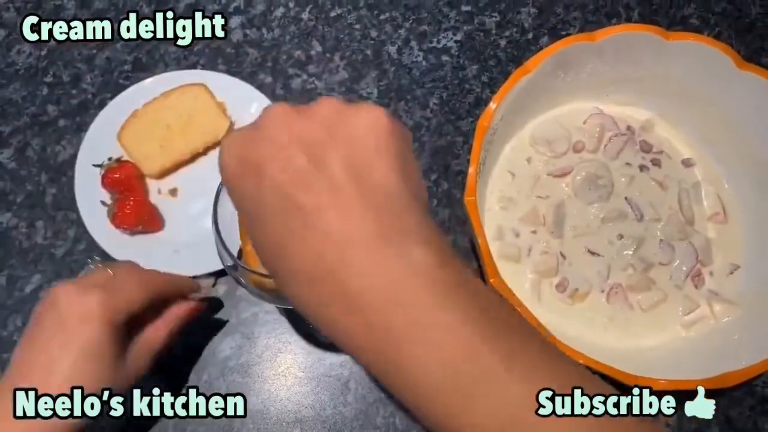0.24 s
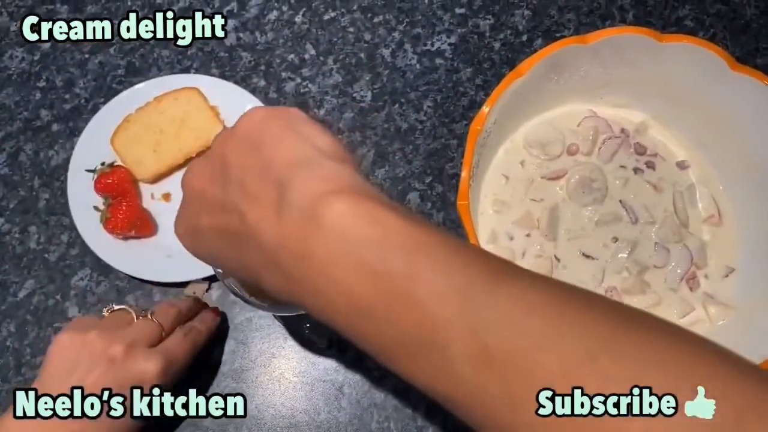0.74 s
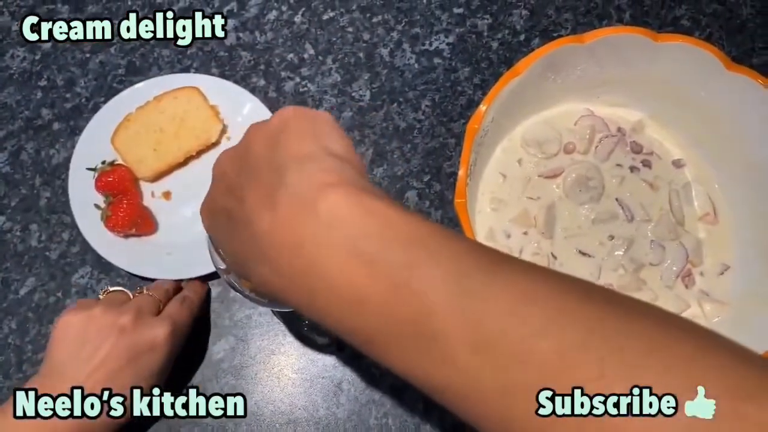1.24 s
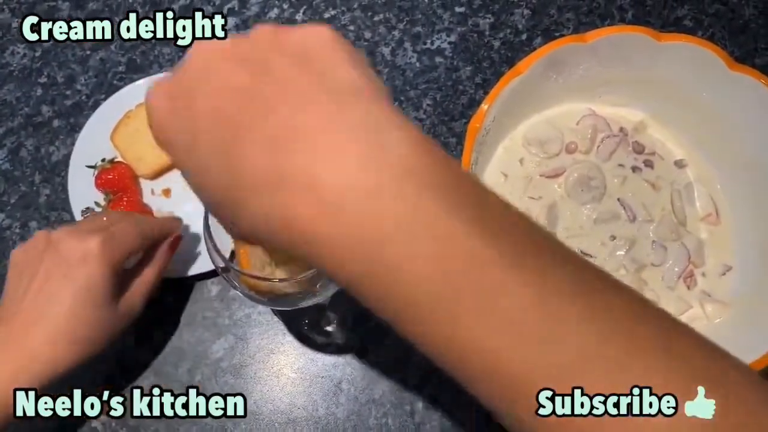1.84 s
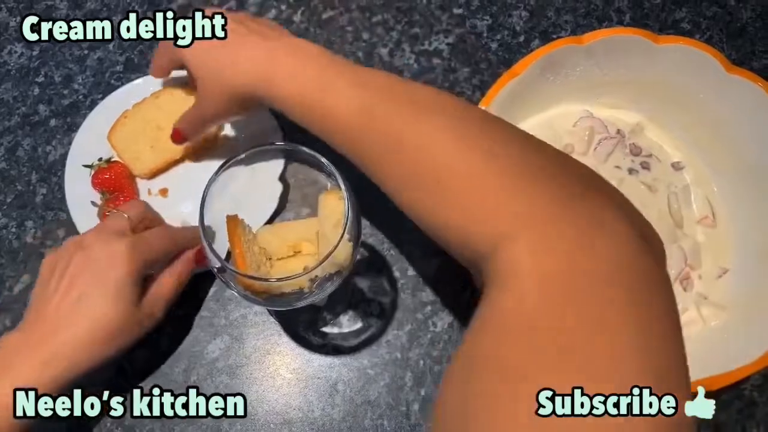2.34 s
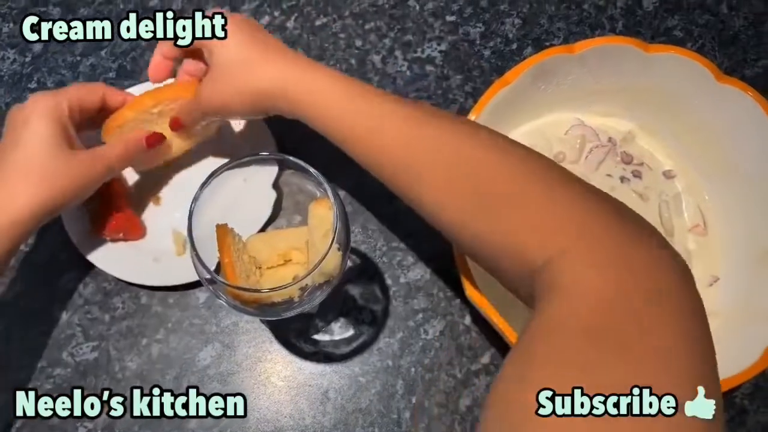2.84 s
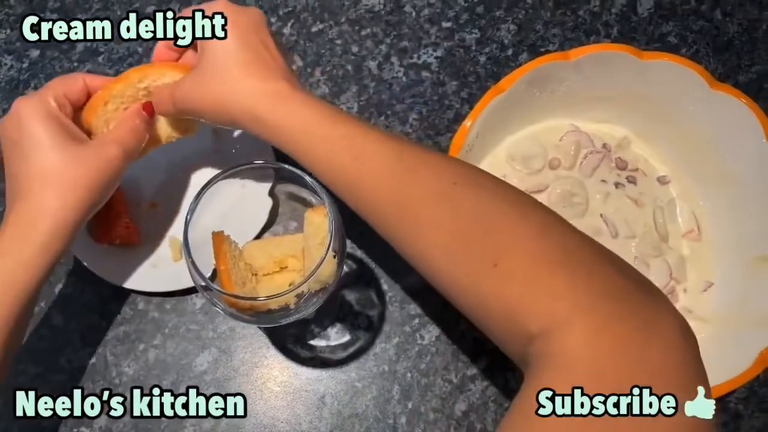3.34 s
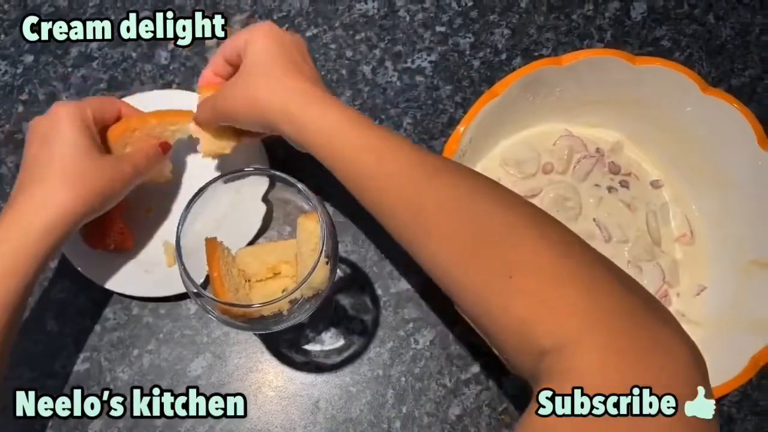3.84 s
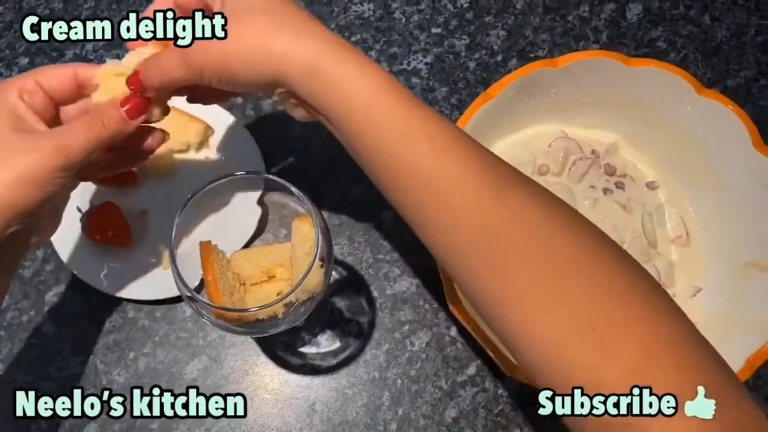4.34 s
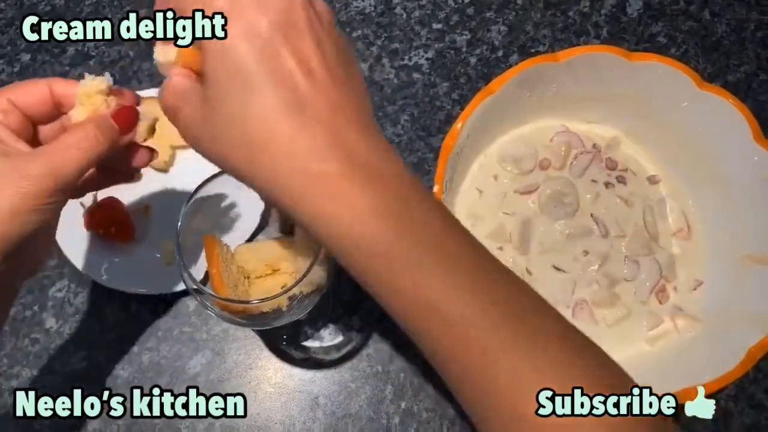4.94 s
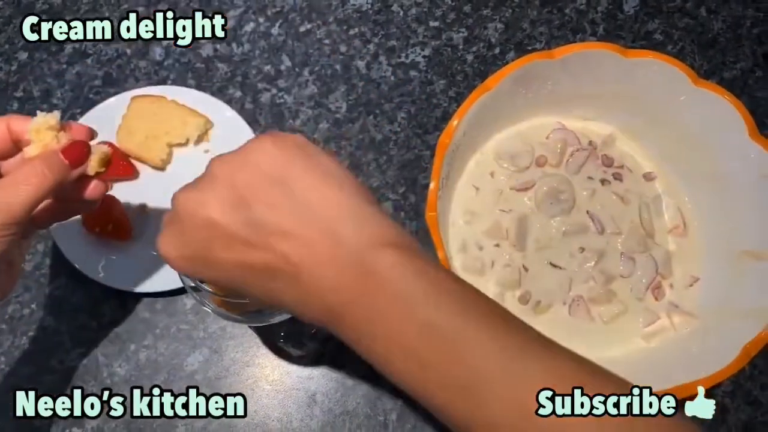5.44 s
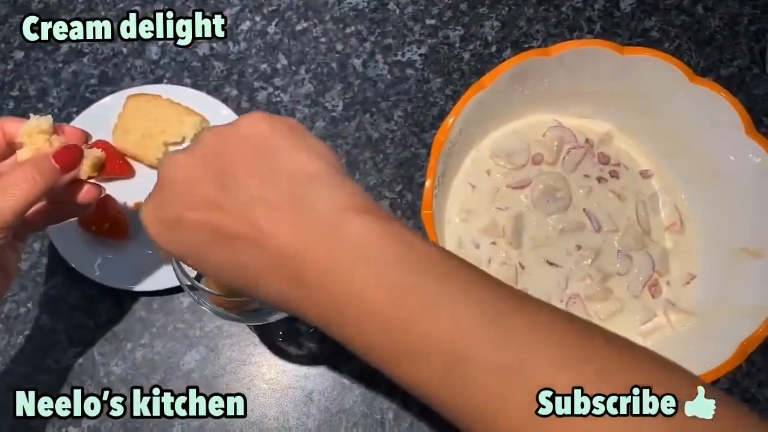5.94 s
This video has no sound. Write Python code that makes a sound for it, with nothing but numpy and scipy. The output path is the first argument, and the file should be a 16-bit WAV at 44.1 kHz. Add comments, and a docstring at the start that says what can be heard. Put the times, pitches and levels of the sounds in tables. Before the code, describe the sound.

Quiet kitchen handling: faint rubbing and crumbly tearing, a china tick, a thud, then a sharp plate knock and small glass clinks.

```python
"""A china plate tips and knocks on a stone kitchen counter as soft cake is torn and laid into a glass.
Glass and plate ring as sums of dying modes, struck by a nail or driven by stick and slip along the edge.
Knocks add dull modes, a noise crack and a worktop boom; ticks and a sagging buzz follow the plate.
Filtered noise makes the brushing arm, tearing cake, crumbs, pressing and rubbing fingers.
Air, rumble, hum and a faint wandering band lie beneath; a small room answers the contacts."""
import sys
import numpy as np
from scipy import signal
from scipy.fft import rfft, irfft, next_fast_len
from scipy.io import wavfile

SR = 44100
rng = np.random.default_rng(int(sys.argv[2]) if len(sys.argv) > 2 else 0)


def file_out(sig):
    """Save sig as 16-bit WAV at sys.argv[1]."""
    # one column per channel
    cols = np.atleast_2d(sig).T
    # limit, then scale
    lim = np.clip(cols, -1, 1)
    pcm = np.round(lim * 32767).astype(np.int16)
    wavfile.write(sys.argv[1], SR, pcm)


N = 272532

# knocks on the counter: t/s, level/dB, contact hardness as corner f/Hz, crack level/dB, boom level/dB,
# boom centre f/Hz
KNOCK_EVENTS = [(0.682, -41.5, 555, -68, -67, 250), (0.7491, -35, 2720, -47.5, -55, 250),
                (2.272, -63, 920, -46.5, -67, 199.7), (2.279, -20, 935, -33.5, -35, 110),
                (3.885, -58, 350, -70, -33.5, 218), (3.941, -17, 1620, -21, -22, 190),
                (3.973, -46, 1710, -52, -25.5, 108.1), (3.988, -23, 520, -43, -32, 110),
                (5.025, -52.5, 1496, -78, -64.5, 259), (5.4475, -32, 525, -55, -33, 223),
                (5.463, -54, 348, -66, -42, 111), (5.478, -32.5, 392, -60, -43, 121),
                (5.899, -39, 403, -58, -31, 400), (5.914, -51, 350, -77.5, -34.5, 109.4),
                (5.939, -47.5, 347, -69.5, -43, 261)]
# left-right likeness of diffuse sound: f/Hz, likeness (0 to 1)
DIFFUSE_LIKENESS = [(100, 0.99), (250, 0.68), (500, 0.022), (1500, 0.017), (4500, 0.23), (7000, 1),
                    (14000, 1)]


def amp(db):
    """Level in decibels to amplitude ratio."""
    return 10 ** (np.asarray(db) / 20)


def unit(x):
    """Normalization to a root-mean-square value of 1."""
    return x / np.sqrt(np.mean(x ** 2) + 1e-20)


def read(points, hz):
    """Linear interpolation of a table along a log-frequency axis."""
    f, value = np.transpose(points)
    return np.interp(np.log(hz + 1), np.log(f + 1), value)


def read_gain(points, hz):
    """Amplitude response read from a spectrum in decibels."""
    return amp(read(points, hz))


def add(mix, s, sound):
    """Superposition: a sound is summed into the mix from s seconds on."""
    part = mix[max(round(s * SR), 0):][:len(sound)]
    part += sound[:len(part)]


def shaped(x, gain):
    """Linear filtering: the spectrum is multiplied by a function of frequency."""
    size = next_fast_len(x.shape[-1], True)
    spectrum = rfft(x, size) * gain(np.fft.rfftfreq(size, 1 / SR))
    return irfft(spectrum, size)[..., :x.shape[-1]]


def octave_distance(hz, centre_hz, octaves):
    """Pitch distance on a logarithmic scale, in units of the given width."""
    return np.log2((hz + 1) / centre_hz) / octaves


def pair(size, likeness):
    """Partial coherence: sum and difference noises set how alike two close microphone ports hear a field."""
    mid, side = rng.standard_normal((2, size))
    mid = shaped(mid, lambda hz: np.sqrt((1 + np.clip(read(likeness, hz), 0, 1)) / 2))
    side = shaped(side, lambda hz: np.sqrt((1 - np.clip(read(likeness, hz), 0, 1)) / 2))
    return np.array([mid + side, mid - side])


def drift(rate_hz):
    """Slow fluctuation of rms 1: noise under a Gaussian low-pass."""
    return unit(shaped(rng.standard_normal(N), lambda hz: np.exp(-(hz / rate_hz) ** 2)))


def swells(rows):
    """A hand movement gathers speed and slows: one Gaussian gain for each, down to 1/e at the half length."""
    t = np.arange(N) / SR
    return sum(amp(db) * np.exp(-((t - s) / half) ** 2) for s, half, db in rows)


def ring(modes, weight, spread_s=0.00039):
    """Modal superposition: dying sines of alternating sign swell as the blow spreads through the body."""
    t = np.arange(SR // 2) / SR
    tone = np.zeros(len(t))
    for k, (hz, db, t60) in enumerate(modes):
        decay = amp(db - 60 * t / t60)
        tone += (-1) ** k * weight(hz) * decay * np.sin(2 * np.pi * hz * t)
    return tone * (1 - np.exp(-t / spread_s))


def slips(size, count=6):
    """Stick-slip excitation: short noise whose spectrum is repeatedly evened to drive the modes alike."""
    noise = rng.standard_normal(SR // 4)[:size]
    for _ in range(count):
        phase = np.angle(rfft(noise, 2 * size))
        noise = irfft(np.exp(1j * phase))[:size] * signal.windows.tukey(size, .5)
    return noise / np.linalg.norm(noise)


def clinks(modes, touches):
    """Impact and stick-slip drive modes; a loose contact modulates them and a finger damps the low ones most."""
    finger_hz, finger_slope = 2907, 1.7  # damping is as stated at this pitch; low modes more by this power
    buzz_hz, buzz_t60_s = 330, 0.17  # corner of the shaking noise, and its decay
    full_graze_s = 0.012  # blow and slips share the energy equally at this length
    t = np.arange(SR // 2) / SR
    out = np.zeros(N)
    for s, db, length, bright, buzz, damping in touches:
        graze = length ** 2 / (length ** 2 + full_graze_s ** 2)
        drive = np.sqrt(graze) * slips(max(round(length * SR), 10))
        drive[0] += np.sqrt(1 - graze)  # the single blow

        held = []
        for hz, level, t60 in modes:
            decay_db_per_s = 60 / t60 + max(damping, 0) * (finger_hz / hz) ** finger_slope
            held.append((hz, level, 60 / decay_db_per_s))
        # the brightness tilt pivots at 4 kHz and stops rising at 5.4 kHz
        body = ring(held, lambda hz: amp(bright * np.log2(min(hz, 5400) / 4000)))
        tone = signal.fftconvolve(drive, body)[:SR // 2]

        shake = unit(shaped(rng.standard_normal(SR // 2), lambda hz: 1 / (1 + (hz / buzz_hz) ** 2)))
        shake *= amp(-60 * t / buzz_t60_s)
        buzz = min(buzz, .7)
        add(out, s, amp(db) * tone * (1 + buzz * shake) / np.sqrt(1 + buzz ** 2))
    return out


def glass():
    """Modal ringing of the glass bowl under nail blows and grazes."""
    # modes of the bowl: f/Hz, level/dB, t60/s
    bowl_modes = [(1157, -14, .52), (2845, -4, .075), (2885, -4, .42), (5335, -6, .11), (5390, 0, .15),
                  (8370, -8, .13), (11700, -21, .08), (12240, -17, .1)]
    # touches: t/s, level/dB, graze length/s, brightness/(dB per octave), buzz depth, finger damping/(dB per s)
    bowl_touches = [(.001, -52.5, .0012, 8.5, 0.26, -3), (.004, -80, .001, -18, .03, -2),
                    (0.034, -68, .001, -13, 0.04, 0), (0.589, -81, 0.028, -6, .1, 0),
                    (0.681, -97, .001, -23, .03, -2), (.685, -77.5, 0.019, 18, .1, 200),
                    (3.377, -77.5, 0.0041, 22, 0.72, 400), (3.883, -72, .015, 2, .4, 297),
                    (3.945, -49.5, 0.0045, 3, .3, 60), (5.0245, -43.5, 0.0021, -0.5, 0.45, 420),
                    (5.05, -56.5, 0.0088, 13, .35, 599), (5.272, -70, 0.052, 13, .45, 499),
                    (5.332, -72.5, 0.018, 15, .4, 494), (5.392, -74.5, 0.067, 17, .45, 397),
                    (5.458, -63.5, 0.043, -4, .35, 480), (5.695, -82, .025, 14, .5, 300),
                    (5.995, -77, .04, 9.5, .5, 399)]
    return clinks(bowl_modes, bowl_touches)


def background(air_swell_db=1, lumps_db=2, hum_swell_db=2.5):
    """Stationary noise and a tone, slowly modulated: kitchen air, low rumble and an appliance's hum."""
    # spectrum of the air: f/Hz, relative level/dB
    air_colour = [(100, 8), (350, -1), (600, -5.5), (1300, -10.5), (1600, -12.5), (2500, -15),
                  (5000, -19.5), (8000, -24.5), (15500, -29)]
    # spectrum of the rumble: f/Hz, relative level/dB
    rumble_colour = [(20, 2.5), (35, 2), (55, 3), (72, 3), (88, -7), (112, 3.5), (135, -7.5), (200, -8),
                     (350, -16), (600, -26), (1200, -58)]
    air_db, rumble_db = -63.5, -57
    hum_hz, hum_db = 49.5, -51.5
    t = np.arange(N) / SR
    air = unit(shaped(pair(N, DIFFUSE_LIKENESS), lambda hz: read_gain(air_colour, hz)))
    air = air * amp(air_db + air_swell_db * drift(14.0))
    rumble = unit(shaped(pair(N, DIFFUSE_LIKENESS), lambda hz: read_gain(rumble_colour, hz)))
    rumble = rumble * amp(rumble_db + lumps_db * drift(15))
    hum = np.sin(2 * np.pi * hum_hz * t) * amp(hum_db + hum_swell_db * drift(5.8))
    return air + rumble + hum


def whir(swell_db=2):
    """Heterodyning: low-passed noise on a wandering carrier gives a faint narrow band that comes and goes."""
    # path of the band: t/s, centre f/Hz, level/dB
    path = [(0, 1208, -98), (.7, 1191, -88), (1, 1218, -74.5), (1.45, 1297, -81), (1.8, 1391, -79.5),
            (2.55, 1370, -81.5), (2.8, 1368, -77), (2.95, 1372, -87), (3.3, 1334, -74.5),
            (3.55, 1324, -95.5), (4.302, 1228, -86.5), (4.55, 1257, -73.5), (4.951, 1263, -97),
            (5.451, 1183, -80), (5.65, 1206, -98), (6.18, 1200, -97.5)]
    half_width_hz = 92
    s, hz, db = np.transpose(path)
    t = np.arange(N) / SR
    flutter = unit(shaped(rng.standard_normal((2, N)), lambda f: 1 / (1 + (f / half_width_hz) ** 2)))
    carrier = np.sqrt(2) * np.sin(2 * np.pi * np.cumsum(np.interp(t, s, hz)) / SR)
    return flutter * carrier * amp(np.interp(t, s, db) + swell_db * drift(7.3))


def pressing(lumps_db=2):
    """Structure-borne friction: dull, lumpy noise as fingers press cake or shift the crockery."""
    # presses: t/s at the strongest, half length/s, level/dB
    presses = [(.06, 0.034, -46.5), (.33, 0.071, -54.5), (.48, 0.055, -56), (.56, 0.064, -56),
               (.8, 0.12, -52.5), (.96, 0.055, -61), (1.25, 0.021, -50.5), (2.38, 0.11, -46.5),
               (2.76, 0.12, -56), (3.52, 0.25, -60.5), (3.86, 0.16, -47.5), (4.06, 0.14, -50.5),
               (5.76, 0.23, -57), (6.03, 0.067, -67)]
    # spectrum of the pressing: f/Hz, relative level/dB
    press_colour = [(30, -26), (70, 13), (110, 7.5), (160, -2), (270, -8), (360, -2), (430, -10.5),
                    (600, -16), (1200, -26.5), (3000, -43)]
    rub = shaped(pair(N, DIFFUSE_LIKENESS), lambda hz: read_gain(press_colour, hz))
    return swells(presses) * unit(rub * amp(lumps_db * drift(18)))


def plate():
    """Modal ringing of the plate's rim under nail blows and grazes."""
    # modes of the rim: f/Hz, level/dB, t60/s
    rim_modes = [(2315, -8, .22), (2352, -11, .08), (3607, 0, .095), (3640, -9, .06), (5115, 3, .09),
                 (5165, -5, .06), (5351, -1, .09), (6880, -17, .11), (7450, -12, .08), (8812, -19, .11),
                 (9281, -17, .11), (10950, -18, .1), (12400, -16, .09), (13400, -19, .08)]
    # touches: t/s, level/dB, graze length/s, brightness/(dB per octave), buzz depth, finger damping/(dB per s)
    rim_touches = [(.283, -58.5, .06, 3, 0.38, 318), (.335, -63.5, 0.022, 16, .35, 288),
                   (.7495, -38.5, 0.0012, -6, 0.31, 2), (.79, -81, 0.011, 12, .3, 0),
                   (.828, -64, 0.018, -3, .3, 0), (1.225, -76, 0.018, 7, 0.41, 298),
                   (2.268, -62, 0.0068, -1, 0.46, 302), (2.29, -66, 0.03, -6, .3, 100),
                   (2.355, -55, .04, -9, 0.52, 231), (2.395, -67, 0.021, -12, .5, 200),
                   (2.55, -72, 0.023, -10, .6, 250), (3.942, -56, 0.0019, -12, .4, 31.5),
                   (3.973, -55.5, .0025, -21.5, 0.34, 101), (4.03, -70, .02, -5, .2, 100)]
    return clinks(rim_modes, rim_touches)


def rubbing(lumps_db=4):
    """Friction-driven resonance: skin drags unevenly over the crockery and wakes its hollow modes."""
    # drags: t/s at the strongest, half length/s, level/dB
    rubs = [(.33, 0.086, -64.5), (.48, 0.036, -62), (1.26, 0.052, -69), (2.78, 0.066, -68),
            (3.46, 0.13, -68.5), (4.8, 0.047, -70), (5.06, 0.052, -67), (5.18, 0.041, -73.5),
            (5.77, 0.065, -75.5)]
    # hollow resonances: f/Hz, level/dB, t60/s
    hollow_modes = [(351, 4, 0.12), (486, -1, 0.071), (573, -14.5, 0.046), (1120, -31, 0.021)]
    drag = rng.standard_normal(N) * amp(lumps_db * drift(27))
    return swells(rubs) * unit(signal.fftconvolve(drag, ring(hollow_modes, lambda hz: 1))[:N])


def knocks():
    """Contact stiffness sets bandwidth: soft blows reach low modes, hard ones more; noise cracks at each."""
    # dull modes of crockery standing on the counter: f/Hz, level/dB, t60/s
    counter_modes = [(231.5, -12, 0.044), (352, -8.5, 0.028), (489, -6.5, 0.047), (530, -6, 0.025),
                     (665, -1.5, 0.017), (753, -6, 0.031), (898, -14, .05), (1083, 1.5, 0.013),
                     (1184, 0.5, 0.019), (1380, -16, 0.05), (1660, -29, 0.08), (2060, -15, 0.059),
                     (2730, -18, 0.018), (3313, -19, 0.14)]
    crack_t60_s, crack_low_hz = 0.028, 557
    crack_slope = 4.5  # the crack falls off as this power of frequency above the corner
    t = np.arange(SR // 4) / SR
    out = np.zeros(N)
    for s, db, corner_hz, crack_db, _, _ in KNOCK_EVENTS:
        tone = ring(counter_modes, lambda hz: 1 / np.sqrt(1 + (hz / corner_hz) ** 6))
        add(out, s, amp(db) * tone)

        def crack_colour(hz):
            """Band-pass response between the fixed low corner and the contact's corner."""
            low_cut = hz ** 2 / (hz ** 2 + crack_low_hz ** 2)
            return unit(low_cut / np.sqrt(1 + (hz / corner_hz) ** (2 * crack_slope)))

        crack = rng.standard_normal(len(t)) * amp(-60 * t / crack_t60_s)
        add(out, s, amp(crack_db) * shaped(crack, crack_colour)[:len(t) // 2])
    return out


def booms():
    """Modal selection by place of blow: each knock favours worktop modes near its own centre."""
    # low modes of the worktop: f/Hz, level/dB, t60/s
    worktop_modes = [(78.8, 2, 0.075), (114.8, -4.5, 0.13), (168.6, -6.5, 0.171), (236, -1.5, 0.087),
                     (355, 0.5, 0.058)]
    rise_s, half_width_octaves = 0.0038, 1.64
    out = np.zeros(N)
    for s, _, _, _, boom_db, centre_hz in KNOCK_EVENTS:
        boom = ring(
            worktop_modes,
            lambda hz: 1 / (1 + (np.log2(hz / centre_hz) / half_width_octaves) ** 2),
            rise_s)
        add(out, s, amp(boom_db) * boom)
    return out


def ticks():
    """Band-limited transients: decaying noise for dry ticks and rattles of nails, crust and crockery."""
    # ticks: t/s, onset level/dB, centre f/Hz, half width/octaves, t60/s
    tick_events = [(0.981, -66.5, 1190, 0.23, 0.17), (1.7351, -58, 4950, 0.11, 0.05),
                   (1.745, -67, 1160, 0.66, 0.18), (2.122, -54.5, 1340, 1.13, 0.38),
                   (2.282, -54, 1830, 0.35, 0.23), (2.28, -36, 1060, 0.17, .04),
                   (2.281, -34, 690, 0.085, .05), (2.284, -41.5, 620, 0.21, 0.34),
                   (2.287, -59, 1200, 0.2, 1), (2.36, -65, 2970, 0.81, 0.56), (2.761, -67, 906, 0.68, 0.17),
                   (3.144, -76, 1270, 0.45, 0.1), (3.2843, -36.5, 3310, 1.4, 0.005),
                   (3.2845, -59, 8900, 0.55, 0.017), (3.285, -62, 3400, 0.76, .08),
                   (3.489, -62, 10100, 0.18, 0.0087), (3.7026, -62.5, 5980, 1, .02),
                   (3.735, -59, 13600, 0.54, 0.022), (3.88, -62.5, 2810, 1.7, 0.075),
                   (3.941, -41, 2760, 0.083, 0.031), (3.945, -45, 2500, 0.32, 0.17),
                   (3.948, -45.5, 1600, 0.25, 0.16), (3.941, -61, 9500, 0.18, 0.14),
                   (3.95, -35, 1080, .13, 0.27), (4.033, -50, 1600, .3, .08),
                   (4.062, -60.5, 1900, 0.45, 0.058), (4.75, -68, 1500, 1.27, 0.37),
                   (5.0243, -43.5, 8100, 2.4, 0.018), (5.064, -46, 11500, 1.4, 0.015),
                   (5.454, -68.5, 9500, 0.95, 0.25), (5.759, -71, 1020, 0.96, 0.26),
                   (5.897, -66.5, 980, 0.25, .08)]
    t = np.arange(SR // 5) / SR
    out = np.zeros(N)
    for s, db, centre_hz, octaves, t60 in tick_events:
        noise = rng.standard_normal(len(t))
        crack = shaped(noise, lambda hz: 1 / (1 + octave_distance(hz, centre_hz, octaves) ** 4))
        add(out, s, amp(db - 60 * t / t60) * unit(crack))
    return out


def crumbs():
    """Random impulses through a band-pass: tiny snaps of crumb, in clumps as the fingers move."""
    # rustles: t/s at the strongest, half length/s, level/dB
    rustles = [(1.05, 0.12, -90), (1.48, .06, -83), (3.5, 0.1, -81), (3.8, 0.21, -83.5), (4.8, 0.17, -83)]
    snaps_per_s, centre_hz, half_width_octaves = 120, 2450, 0.56
    snaps = rng.standard_normal(N) * (rng.random(N) < snaps_per_s / SR)
    rustle = shaped(snaps, lambda hz: 1 / (1 + octave_distance(hz, centre_hz, half_width_octaves) ** 2))
    return swells(rustles) * unit(rustle)


def friction(grain_db):
    """Friction noise of rms 1: amplitude modulation gives the hiss its fine grain."""
    # spectrum of the hiss: f/Hz, relative level/dB
    hiss_colour = [(600, -21), (1500, -2), (3000, 0), (5000, 4.5), (8000, -1.5), (12000, 7), (15000, 5.5)]
    grains = rng.standard_normal(N) * amp(grain_db * drift(200))
    return unit(shaped(grains, lambda hz: read_gain(hiss_colour, hz)))


def brushing():
    """Sliding friction: smooth hiss swells as the arm passes."""
    # passes: t/s at the nearest, half length/s, level/dB
    sweeps = [(2.07, 0.14, -61.5), (2.385, 0.053, -68.5), (2.55, 0.07, -75)]
    return swells(sweeps) * friction(grain_db=1.5)


def tearing():
    """Fracture noise: crumbly hiss starts as the cake gives and ends as it parts."""
    # tears: start t/s, length/s, level/dB, fade/(dB per s; negative grows)
    tears = [(2.91, 0.57, -77.5, 12), (3.67, 0.44, -58, 84), (4.259, 1, -81.5, -3)]
    edge_s = 0.034
    level = np.zeros(N)
    for s, length, db, fade in tears:
        t = np.arange(0, length, 1 / SR)
        edges = np.minimum(np.minimum(t, length - t) / edge_s, 1)
        add(level, s, amp(db - fade * t) * edges)
    return level * friction(grain_db=4.0)


def chatter(overtone_db=-20):
    """Periodic impact as a sagging tone and its octave: the plate's foot buzzes briefly as it settles."""
    # the buzz: t/s, length/s, starting f/Hz, starting level/dB, t60/s
    foot_buzz = (3.9428, .031, 475, -13.3, .25)
    sag_hz_per_s = 1700
    s, length, hz, db, t60 = foot_buzz
    t = np.arange(round(length * SR)) / SR
    phase = 2 * np.pi * np.cumsum(hz - sag_hz_per_s * t) / SR
    buzz = np.sin(phase) + amp(overtone_db) * np.sin(2 * phase)
    out = np.zeros(N)
    add(out, s, amp(db - 60 * t / t60) * buzz * signal.windows.tukey(len(t), .35))
    return out


def kitchen(x, wet_db, build_s=0.0056):
    """Reverberation by convolution: three near reflections and a diffuse tail whose bass lasts longest."""
    # left-right likeness of the tail: f/Hz, likeness (0 to 1)
    tail_likeness = [(100, 1), (420, 0.91), (650, 0.17), (1500, 0.14), (4500, 0.71), (7000, 1), (14000, 1)]
    # reverberation time: f/Hz, t60/s
    room_decay = [(100, 0.69), (300, 0.25), (1200, 0.33), (3000, 0.2), (6000, 0.11), (12000, 0.17)]
    # reflections off counter, wall and cupboard: delay t/s, level/dB relative to the tail
    reflections = [(.0031, -9), (.0074, -22), (0.0103, -11)]
    hz, t, z = signal.stft(pair(SR // 2, tail_likeness), SR, nperseg=256)
    decay = amp(-60 * t / read(room_decay, hz)[:, None])
    tail = signal.istft(z * decay, SR, nperseg=256)[1]
    tail *= 1 - np.exp(-(np.arange(tail.shape[1]) / SR / build_s) ** 2)
    tail /= np.linalg.norm(tail[0])
    for delay, db in reflections:
        tail[:, round(delay * SR)] += amp(db)
    return x + amp(wet_db) * signal.fftconvolve(x[None], tail, axes=1)[:, :N]


def scene():
    """Superposition of sources in one small room, each group with its own reverberant level."""
    rings = kitchen(glass() + plate(), wet_db=-1.5)
    blows = kitchen(knocks(), wet_db=-2.5) + kitchen(booms(), wet_db=-8)
    settling = kitchen(chatter(), wet_db=-12.5)
    rustling = kitchen(ticks() + brushing() + tearing() + crumbs() + rubbing(), wet_db=-7.0)
    return rings + blows + settling + rustling + pressing() + background() + whir()


def record(dry, low_cut_hz=42):
    """Interport phase: the two ports drift apart towards the treble; a bass cut and band limit follow."""
    # phase between the microphone ports: f/Hz, lead of left over right/rad
    port_lead = [(0, 0), (1500, -.1), (3000, 1), (5200, .5), (7300, 3.14), (10400, 6.28), (13300, 9.42),
                 (15800, 11.8)]
    edge_hz = 15600

    def port_phase(hz):
        """Half the lead is given to each port, with opposite signs."""
        lead = np.interp(hz, *np.transpose(port_lead))
        return np.exp(np.outer([.5j, -.5j], lead))

    ports = shaped(dry, port_phase)
    highpass = signal.butter(2, low_cut_hz, "highpass", fs=SR, output="sos")
    ports = signal.sosfilt(highpass, ports)
    lowpass = signal.firwin(511, edge_hz, window=("kaiser", 9), fs=SR)
    return signal.oaconvolve(ports, lowpass[None], "same")


dry = scene()
out = record(dry)
file_out(out)
```